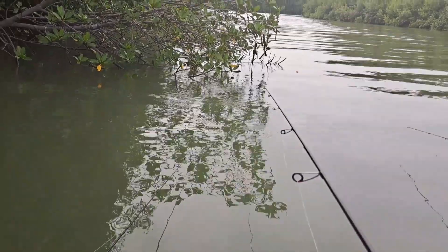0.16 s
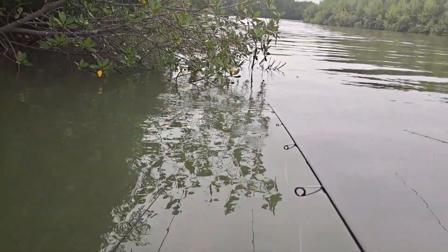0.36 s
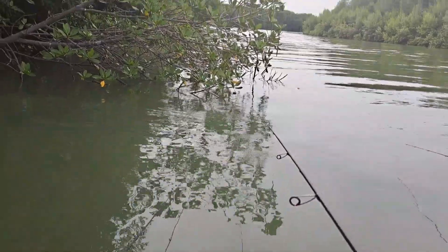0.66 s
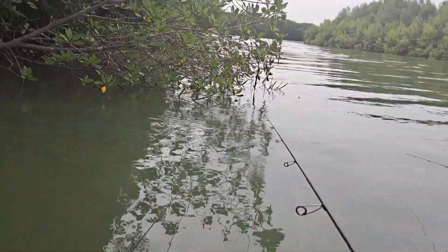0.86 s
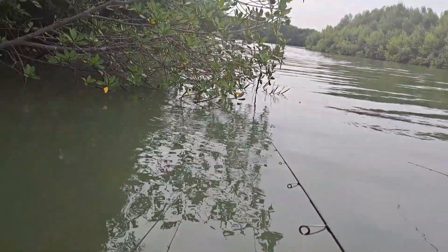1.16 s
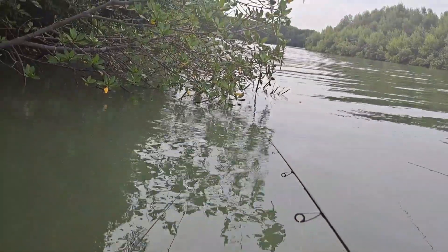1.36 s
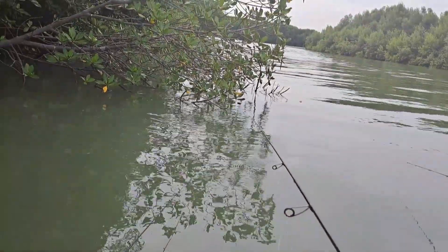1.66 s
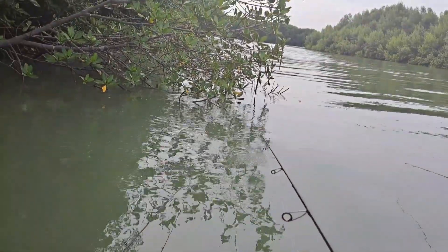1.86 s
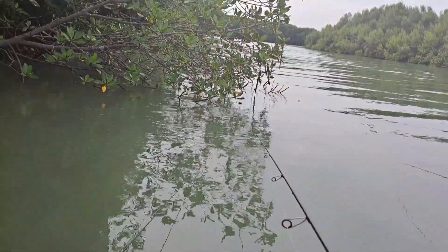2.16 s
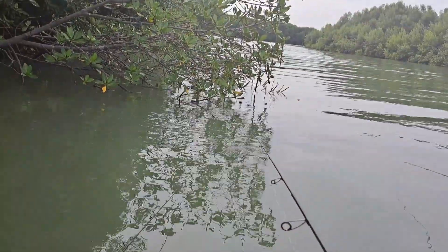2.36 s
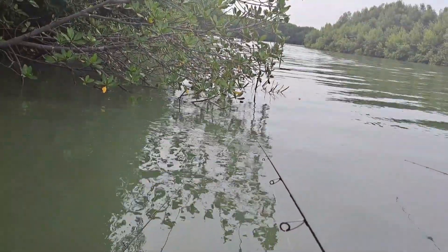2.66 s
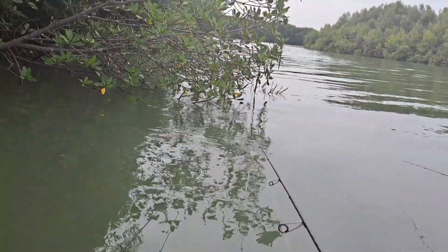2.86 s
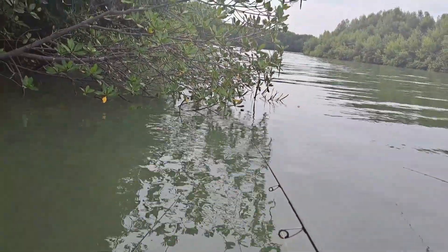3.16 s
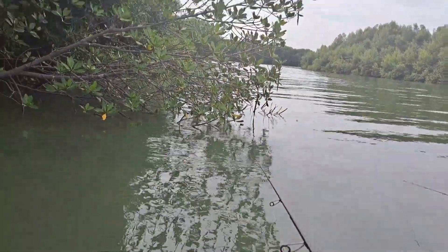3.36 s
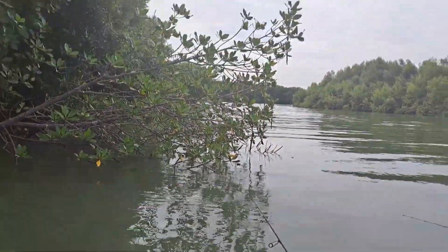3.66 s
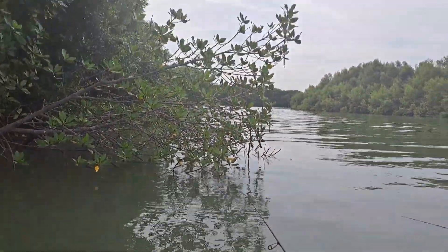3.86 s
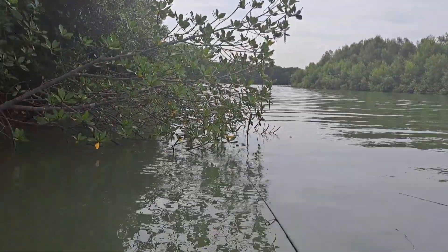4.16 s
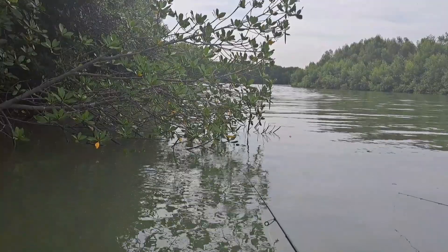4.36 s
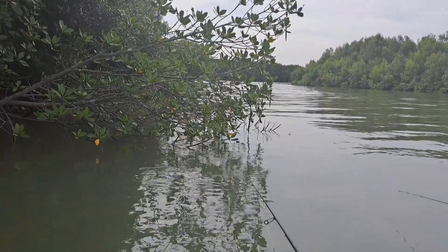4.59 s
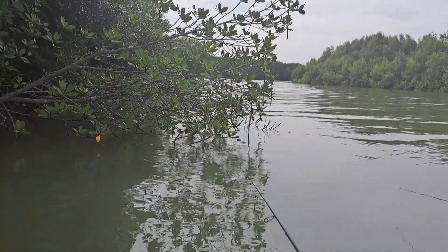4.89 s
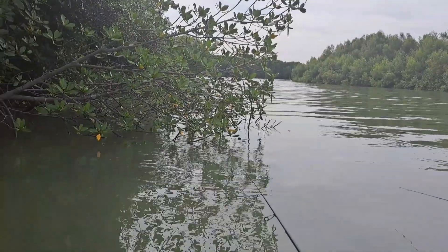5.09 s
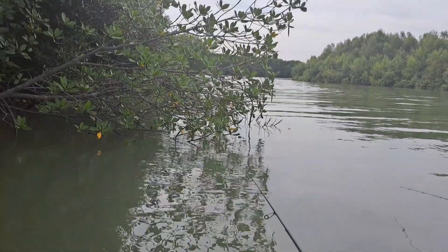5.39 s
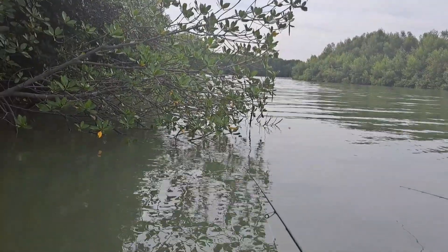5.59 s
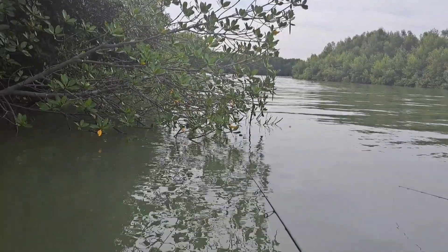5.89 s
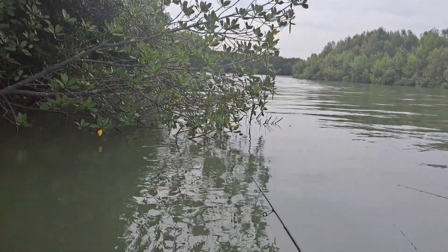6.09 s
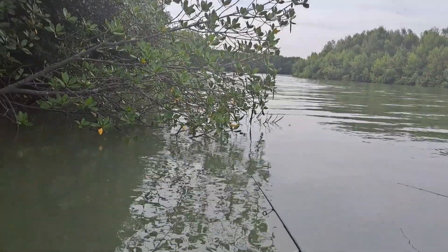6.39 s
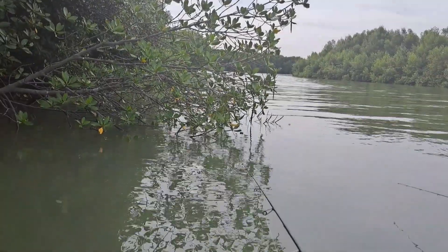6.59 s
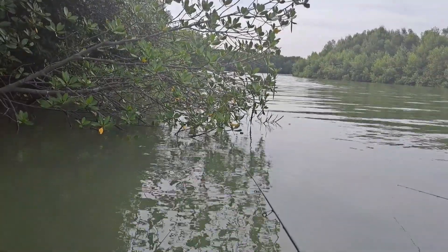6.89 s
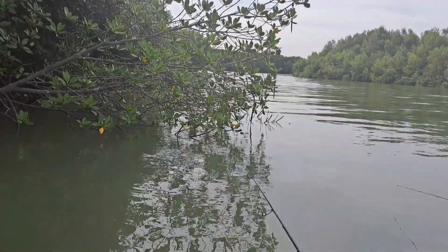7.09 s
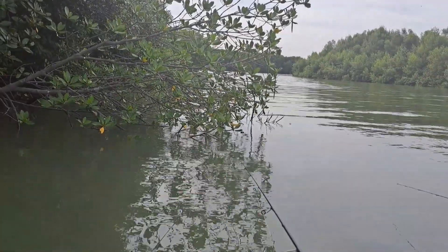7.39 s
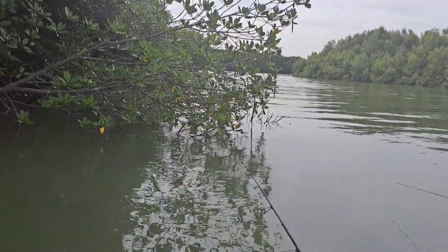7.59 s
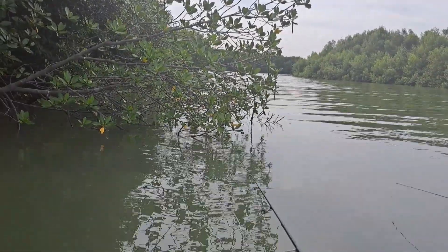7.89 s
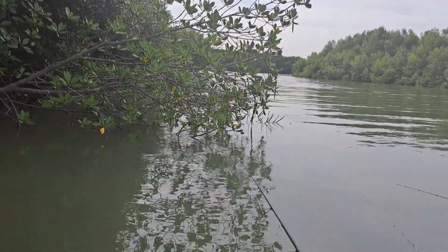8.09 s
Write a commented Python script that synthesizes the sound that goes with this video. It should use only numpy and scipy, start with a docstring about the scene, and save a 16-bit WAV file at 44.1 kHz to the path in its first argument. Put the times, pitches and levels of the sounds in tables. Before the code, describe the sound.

A shrill, steady insect drone fills a mangrove riverbank while birds give short falling buzzy whistles, a sharp click sounds, and soft low thumps follow.

```python
"""Mangrove river from a boat

Insects shrill steadily in the trees: bands of noise with a few wavering sines standing out. Birds give
buzzy falling whistles and thin calls (trilled sines), sharp hoarse chirps and far hoots.
Water laps and drips at the hull (rising sines and noise bursts); a hand on the camera makes a sharp click,
lighter knocks and low thumps. Shaped noise makes wind, a far low rumble, river wash and leaf hiss."""
import sys
import numpy as np
from scipy import signal
from scipy.fft import rfft, irfft
from scipy.io import wavfile

SR = 44100
rng = np.random.default_rng(int(sys.argv[2]) if len(sys.argv) > 2 else 0)


def waveform_to_disk(signal):
    """Save audio, clipped to [-1, 1], as 16-bit WAV at the path in sys.argv[1]."""
    frames = np.transpose(np.atleast_2d(signal))
    scaled = np.clip(frames, -1, 1) * 32767
    samples = np.round(scaled).astype(np.int16)
    wavfile.write(sys.argv[1], SR, samples)


N = 363825
TIME = np.arange(N) / SR
HZ = np.fft.rfftfreq(N, 1 / SR)

# In every table a left-right balance in dB is positive towards the left.
# Colour of the insect chorus. Each row: frequency in Hz, relative level in dB per Hz.
CHORUS_COLOUR = [(6700, -63), (7100, -33.5), (7450, -30), (7750, -18), (8050, -6.5), (8300, 1.5),
                 (8450, -0.5), (8650, 0), (8800, -8.5), (8950, -20), (9250, -27), (9600, -34), (10300, -48)]
# Single insects that stand out. Each row: pitch in Hz, typical waver in Hz,
# base level in dB against the chorus, left-right balance in dB.
SOLO_INSECTS = [(8100, 22, -22, -7.5), (8260, 29.47, -12, -0.5), (8320, 40, -6.5, 6),
                (8390, 25.04, -15, 12), (8676, 45, -15, 4.5), (9050, 7.8, -26.5, 9.5),
                (9040, 31, -27.5, 8.5)]
# The chorus sings in surges with brief lulls. Each row: time in seconds, level change in dB.
CHORUS_SURGE = [(0, 0.9), (0.22, 2.9), (0.5, 2), (0.62, 1.3), (0.85, 0.7), (1.25, 2.5), (1.42, 0.4),
                (1.57, -1.0), (1.68, 2.2), (2.0, 3), (2.2, 3), (2.6, 0.8), (2.8, 1), (3.05, 0.8), (3.52, 0),
                (3.62, -2), (4.08, 1.5), (4.3, 0), (4.68, 0.0), (4.82, 1.5), (5.22, -1.2), (5.58, 2.1),
                (5.82, 0), (5.94, 3.5), (6.25, 2), (6.52, 2.5), (6.72, 0.5), (6.9, 3), (7.15, 1.7),
                (7.5, 4), (7.78, -0.7), (7.98, 2.0), (8.25, 3.9)]
CHORUS_DB, CHORUS_PAN_DB = -52, 0.5  # level before the surges, and resting left-right balance

# Falling whistles, one curve for each. Each row of a curve: time in seconds, pitch in Hz, level in dB.
WHISTLE_CURVES = [
    [(.375, 3190, -83), (.44, 3173, -69), (.56, 3190, -67.5), (.68, 3130, -74), (.71, 3096, -65),
     (.85, 2993, -69.5), (.885, 2880, -79), (.912, 2835, -66.5), (.945, 2820, -70), (.965, 2750, -83)],
    [(1.97, 3090, -82), (2.02, 3205, -71), (2.11, 3370, -78), (2.18, 3294, -69.5), (2.25, 3170, -64),
     (2.31, 3128, -64.5), (2.465, 2930, -72), (2.5, 2918, -64), (2.535, 2883, -65), (2.56, 2830, -81)],
    [(2.71, 3500, -91), (2.79, 3304, -67), (2.86, 3190, -65.5), (2.95, 2930, -72), (3.02, 2830, -71),
     (3.095, 2780, -83)],
    [(5.315, 3100, -82), (5.355, 3160, -71), (5.39, 3260, -71), (5.425, 3510, -76), (5.48, 3530, -73.5),
     (5.545, 3380, -68), (5.6, 3190, -68.5), (5.66, 3066, -66.5), (5.77, 2994, -69.5), (5.79, 2950, -76),
     (5.83, 2890, -66), (5.888, 2895, -64.5), (5.91, 2830, -87)],
]
# Length in seconds of the clear note that closes each whistle, in the same order.
WHISTLE_CLOSINGS = [.06, 0.086, 0.029, 0.084]
# Thin high calls. Each row: start in seconds, length in seconds, first pitch in Hz, last pitch in Hz,
# level in dB, length of the held note in seconds, level of the held note in dB.
THIN_CALL_ROWS = [(0, 0.22, 4485, 4476, -68, .09, -62.5), (0.398, .268, 4370, 4358, -77, 0.076, -71.5),
                  (1.67, 0.2, 4160, 3980, -79, 0.04, -76), (1.766, .28, 3830, 3740, -85, 0.11, -84),
                  (1.88, 0.14, 3995, 3985, -81, .043, -88), (2.073, 0.15, 3660, 3780, -77, 0.079, -76),
                  (5.022, 0.095, 4340, 4010, -81.5, 0.022, -70.5),
                  (5.142, 0.14, 3960, 3895, -72, 0.039, -87)]
# A faint, very high squeak. Each row: time in seconds, pitch in Hz, level in dB.
SQUEAK_CURVE = [(2.19, 10800, -82), (2.24, 11600, -68), (2.27, 10900, -79), (2.33, 11300, -69),
                (2.38, 10600, -79)]
# Chirps. Each row: start in seconds, length in seconds, top pitch in Hz, level in dB,
# rasp as a share of the pitch, hoarse upper voice in dB, left-right balance in dB.
CHIRP_ROWS = [(0.18, 0.092, 4290, -66.5, 0.046, -7, -7.5), (1.214, 0.0624, 3907, -62, 0.014, -28, -19),
              (1.216, .12, 5150, -75, 0.023, -18, -5), (1.45, 0.064, 3220, -82, .006, -30, -20.5),
              (3.433, 0.028, 4900, -73.5, 0.048, -34, -25), (4.789, .04, 3400, -87, .004, -28, -8)]
# Far hollow bird calls. Each row: start in seconds, length in seconds, pitch in Hz,
# level in dB before a 3 dB cut.
HOOT_ROWS = [(3.693, 0.17, 705, -65), (7.542, 0.12, 595, -69), (7.628, 0.22, 690, -68)]
# Echo of the bank. Each row: frequency in Hz, seconds to die by 60 dB at full linger.
BANK_ECHO = [(200, 0.15), (1500, 0.33), (4000, 0.58), (12000, 0.033)]
SLUR_S, RELEASE_S = 0.024, 0.012  # a trill melts into its held note; a trilled call fades in and out
FALL_BOW = 2  # over 1, the pitch of a thin call moves early and then flattens

# A sharp click with its bounces, then lighter knocks on the camera.
# Each row: start in seconds, peak of the push in dB before panning, corner in Hz above which it dulls.
KNOCK_ROWS = [(3.4116, -32.5, 1260), (3.415, -22, 1420), (3.4184, -33.5, 3500), (3.4188, -47, 1200),
              (3.4249, -41, 1210), (3.4269, -41, 3000), (3.437, -43, 1110), (3.4799, -34, 1110),
              (3.488, -50, 900), (3.499, -42, 1020), (3.669, -43, 1030), (3.786, -45.5, 950),
              (4.479, -41, 1130), (4.62, -50, 1910), (5.153, -46.5, 920), (5.787, -51.5, 940),
              (6.43, -56, 800), (7.039, -53, 695)]
# Colour of the camera body. Each row: frequency in Hz, level in dB.
CASE_COLOUR = [(60, -14), (200, -5.5), (330, 12.5), (480, 14.5), (700, 9), (950, 9), (1200, 6.5), (1650, 1),
               (2100, 2.5), (2600, 2.5), (4000, 7), (7000, 6), (15000, -60)]
# Ringing of the camera body. Each row: pitch in Hz, level in dB against the push,
# seconds to die by 60 dB.
CASE_RINGS = [(440, -27, 0.067), (607, -38, 0.037), (1170, -34, 0.066), (1640, -22, 0.029),
              (1860, -24, .03), (2035, -33.5, .03), (2370, -36, 0.028)]
KNOCK_PAN_DB = -22  # the hand is by the right port
PORT_LAG_S = .0005  # sound from the right reaches the left port this much later
# Soft thumps. Each row: start in seconds, level in dB, settled pitch in Hz, swell time in seconds,
# left-right balance in dB.
THUMP_ROWS = [(4.068, -28.5, 46.3, 0.026, -24), (4.305, -35.5, 52.5, 0.029, -22),
              (4.506, -38.5, 46, 0.022, -19), (4.85, -43, 59.5, 0.022, -13), (5.455, -39, 49.1, 0.05, -23),
              (5.59, -48, 70, 0.032, -28)]

# Laps at the hull, a low plop with brighter splashes. Each row: start in seconds, level in dB before
# the plop and slap trims, pitch of plop and slap in Hz, splash centre in Hz,
# splash in dB against the row's level, left-right balance in dB.
LAP_ROWS = [(.666, -35.5, 356, 1160, -24.5, 5), (.823, -37.5, 357, 1040, -19.5, -7.5),
            (1.367, -49, 484, 1150, -9, -13), (4.478, -45.5, 405, 1930, -27, -7),
            (4.618, -46, 410, 1960, -22.5, -5)]
# Drips and small plops. Each row: start in seconds, level in dB, centre in Hz, width in octaves,
# seconds to die by 60 dB, left-right balance in dB.
DRIP_ROWS = [(.957, -63, 1910, 0.13, .07, 0), (1.068, -60.5, 1220, 0.09, 0.09, -11),
             (2.864, -67, 2230, 0.15, 0.31, -7), (5.189, -69.5, 1980, 0.21, 0.24, 4),
             (7.978, -51, 1870, 0.37, 0.12, -10), (7.989, -64, 2030, 0.27, 0.1, -10),
             (7.98, -62.5, 5000, 2.5, .2, 8)]
# Dry ticks of the tackle. Each row: start in seconds, level in dB, centre in Hz, width in octaves.
TICK_ROWS = [(.692, -40.5, 2700, 1.4), (1.368, -52, 1810, 1.5), (1.374, -47.5, 2300, 1.1),
             (1.518, -56, 5800, 0.49), (2.365, -59, 5000, 1.1), (3.228, -41, 11400, 0.39),
             (3.229, -55, 2560, 0.42)]

# A faint low hum. In order: start in seconds (before zero, so it begins at zero), length in seconds,
# pitch in Hz, level in dB.
LOW_HUM = (-0.15, 1.88, 218.5, -62)
# Colour of the open air. Each row: frequency in Hz, relative level in dB per Hz.
AIR_COLOUR = [(15, -43), (25, -22.5), (40, -16.5), (54, -1), (92, -6.5), (145, -2), (230, -8.5), (300, -14),
              (450, -20), (700, -26), (850, -35), (1150, -43), (1600, -49), (2400, -47.5)]
# Colour of the leaf hiss. Each row: frequency in Hz, relative level in dB per Hz.
HISS_COLOUR = [(1500, 2.5), (2500, -1), (4000, -2.5), (6500, -7), (10000, -5.5), (11500, 2), (13000, -2),
               (15500, -6)]
# How alike left and right are in the air. Each row: frequency in Hz, likeness from 0 to 1.
AIR_LIKENESS = [(50, 0.98), (130, 0.9), (290, 0.83), (640, 0.071), (1400, 0), (15000, 0)]
# Side the air leans to. Each row: frequency in Hz, left-right balance in dB.
AIR_SIDES = [(60, -1), (130, -1.5), (290, -0.5), (640, 2.5), (1410, -8), (3100, -22), (6820, 13),
             (15000, 0.5)]
# Strength of the breeze, full in the low wind and partial in the rumble.
# Each row: time in seconds, level change in dB.
BREEZE_CURVE = [(0, -1.5), (.8, 1), (1.6, -2), (2.6, -1.5), (3.1, -1), (3.7, 0.5), (5.8, 1.5), (6.2, 6),
                (6.8, 3.5), (7.4, 8.5), (8.25, 2.5)]
# Ripples wash in among the roots. Each row: middle in seconds, length in seconds, rise in dB.
RIPPLE_ROWS = [(.4, 2.24, 7), (1.3, 0.8, 12), (1.8, 0.86, 6.5), (2.25, 0.56, 7), (3.05, 0.72, 6),
               (4.1, 2.5, 5.5), (5, 0.6, 7), (5.85, 0.27, 5), (7.5, 4, 4)]
# Leaf hiss, which settles. Each row: time in seconds, level in dB before a 10 dB lift.
LEAF_CURVE = [(0, -76.5), (.2, -84), (1.35, -82.5), (1.6, -87.5), (3.1, -85.5), (3.8, -87), (6.4, -87.5),
              (8.25, -87.5)]
EDGE_HZ = 15600  # upper limit of the camera's sound


def insects(throb_hz=16.3, throb_s=0.008, throb_drift=0.01, near_db=-9.5, flutter_db=0.36,
            sway_db=0.3, solo_surge=0.6, solo_swell_db=1.8, drift_hz=7):
    """Countless tymbals blur into a shrill band; a near insect pulses and soloists waver and swell."""
    surge, = follow(CHORUS_SURGE, TIME)
    colour = gain_of(read(CHORUS_COLOUR, HZ))
    crowd = evened(irfft(rfft(rng.standard_normal((2, N))) * colour, N))
    # seconds since the near insect's last pulse; each pulse starts sharply and dies
    turns = np.cumsum(throb_hz * (1 + throb_drift * wander(N, 2.5))) / SR
    since = turns % 1 / throb_hz
    bursts = rng.standard_normal(N) * np.exp(-since / throb_s)
    near = evened(irfft(rfft(bursts) * colour, N))
    out = crowd + gain_of(near_db) * from_right(place(near, 0))
    for hz, waver, db, side in SOLO_INSECTS:
        pitch = hz + drift_hz * wander(N, 1.497)
        # each ear gets its own quick waver
        voice = evened(np.array([tone(pitch + waver * wander(N, 72.0)) for port in range(2)]))
        extra_surge = solo_surge * (surge - surge.mean())
        level = gain_of(db + extra_surge + solo_swell_db * wander(N, 3.6))
        out += level * place(voice, side)
    out = place(out / np.std(out.mean(0)), CHORUS_PAN_DB + sway_db * wander(N, 5.6))
    return out * gain_of(CHORUS_DB + surge + flutter_db * wander(N, 4.3))


def birds(chirp_db=0, song_echo_db=-14, song_linger=0.41, chirp_echo_db=-8.0):
    """Whistlers on the bank; chirps and hoots, from deeper among the branches, have a stronger echo."""
    songs, calls = whistles() + thin_calls(), np.zeros((2, N))
    start, end = SQUEAK_CURVE[0][0], SQUEAK_CURVE[-1][0]
    hz, db = follow(SQUEAK_CURVE, np.arange(start, end, 1 / SR))
    squeak = gain_of(db) * trill(hz, rate_hz=117, depth_hz=163, gap=0.32, rasp=1.2)
    add(songs, start, place(squeak, 5.1))
    for row in CHIRP_ROWS:
        s, sound = chirp(*row)
        add(calls, s, gain_of(chirp_db) * sound)
    for s, length, hz, db in HOOT_ROWS:
        add(calls, s, place(note(length, hz, db - 3.0, waver=0.057, waver_hz=110), 11))
    song_echo = gain_of(song_echo_db) * bank(songs, song_linger)
    call_echo = gain_of(chirp_echo_db) * bank(calls)
    return from_right(songs + calls + song_echo + call_echo)


def whistles(fast_hz=108, slow_hz=50, low_hz=2850, high_hz=3480, end_depth_hz=42, top_depth_hz=85,
             gap=0.88, held_quaver=0.2, rasp=0.43, strain_rasp=0.34, pan_db=-12.5):
    """A trill slows and narrows as its pitch falls, then melts into a clear note; high pitch is hoarser."""
    out = np.zeros((2, N))
    for curve, held in zip(WHISTLE_CURVES, WHISTLE_CLOSINGS):
        start, end = curve[0][0], curve[-1][0]
        t = np.arange(start, end, 1 / SR)
        hz, db = follow(curve, t)
        height = np.clip((hz - low_hz) / (high_hz - low_hz), 0, 1)
        quaver = 1 - settled(t, end - held) * (1 - held_quaver)
        rate = slow_hz + (fast_hz - slow_hz) * height
        depth = end_depth_hz + (top_depth_hz - end_depth_hz) * height
        hoarseness = rasp + strain_rasp * height ** 4
        voice = trill(hz, rate, quaver * depth, quaver * gap, rasp=hoarseness)
        add(out, start, place(voice * gain_of(db), pan_db))
    return out


def thin_calls(rate_hz=45, depth_hz=30, start_db=-1, held_quaver=0.11, pan_db=-6):
    """A higher, thinner voice quavers and glides into its clear note."""
    out = np.zeros((2, N))
    for s, length, first_hz, last_hz, db, held, held_db in THIN_CALL_ROWS:
        t = np.arange(0, length, 1 / SR)
        ahead = 1 - t / length  # share of the call still to come
        clear = settled(t, length - held)
        quaver = 1 - clear * (1 - held_quaver)
        pitch = last_hz + (first_hz - last_hz) * ahead ** FALL_BOW
        voice = trill(pitch, rate_hz, quaver * depth_hz, gap=0.93 * quaver,
                      uneven=0.483, rasp=0.69, waver_db=-0.5)
        level = db + start_db * ahead ** 4 + clear * (held_db - db)
        add(out, s, place(voice * gain_of(level), pan_db))
    return out


def trill(hz, rate_hz, depth_hz, gap, uneven=0.15, rasp=0.41, waver_db=1.5):
    """A run of quick upward flicks around a pitch curve; the voice dips between them."""
    size = len(hz)
    turns = np.cumsum(rate_hz * (1 + uneven * wander(size, 45))) / SR
    pause, flick = np.cos(np.pi * turns) ** 4, -np.sin(2 * np.pi * turns)
    pitch = hz + depth_hz * (flick + rasp * wander(size, 330))
    voice = tone(pitch) * (1 - np.clip(gap, 0, 1) * pause)
    left_s = np.arange(size)[::-1] / SR
    nearest_end_s = np.minimum(left_s, left_s[::-1])
    edges = np.sin(np.pi / 2 * np.minimum(nearest_end_s / RELEASE_S, 1))
    return evened(voice) * gain_of(waver_db * wander(size, 24)) * edges


def settled(t, start):
    """Goes smoothly from 0 to 1 as a trill melts into its closing note."""
    return .5 + .5 * np.tanh(2 * (t - start) / SLUR_S)


def chirp(s, length, top_hz, db, rasp, upper_db, pan_db, arch=0.069, upper_ratio=1.17, upper_octaves=0.21):
    """A short note whose pitch arches, with a hoarse band of noise above it."""
    u = np.linspace(-1, 1, int(length * SR))
    hz = top_hz * (1 - arch * (u - .1) ** 2 + rasp * wander(len(u), 640))
    hoarse = gain_of(upper_db) * band(len(u), top_hz * upper_ratio, upper_octaves)
    voice = evened((tone(hz) + hoarse) * signal.windows.tukey(len(u), .6))
    return s, place(gain_of(db) * voice, pan_db)


def note(length, hz, db, waver, waver_hz, sag=0):
    """A soft-edged clear note whose pitch wavers by a small share; a positive sag makes it sink."""
    u = np.linspace(-.5, .5, int(length * SR))
    pitch = hz * (1 - sag * u + waver * wander(len(u), waver_hz))
    return gain_of(db) * evened(tone(pitch) * signal.windows.tukey(len(u), .55))


def bank(x, linger=1):
    """Scattered echoes from trunks and leaves die at a speed set by pitch; linger scales their time."""
    taps = rng.standard_normal((2, SR)) * (rng.random((2, SR)) < .05)
    hz, t, z = signal.stft(taps, SR, nperseg=256)
    fade = gain_of(-60 * t / (linger * read(BANK_ECHO, hz)[:, None]))
    build_up = np.minimum(t / 0.013, 1)
    tail = signal.istft(z * fade * build_up, SR, nperseg=256)[1]
    return signal.fftconvolve(x.mean(0)[None], tail / np.linalg.norm(tail[0]), axes=1)[:, :N]


def knocks(rattle_db=-31, rattle_t60=0.73, rattle_per_s=520, slope=4.5, crack_db=-39):
    """A dull push rings the camera body briefly, then a faint rattle of tiny contacts follows."""
    out, size = np.zeros((2, N)), 4096
    t, hz = np.arange(size) / SR, abs(np.fft.fftfreq(size, 1 / SR))
    ring = sum(gain_of(db - 60 * t / t60) * np.sin(2 * np.pi * f * t) for f, db, t60 in CASE_RINGS)
    for s, db, corner_hz in KNOCK_ROWS:
        # treble falls away above the corner, down to a small crisp remainder
        contact = (1 + (hz / corner_hz) ** (2 * slope)) ** -.5 + gain_of(crack_db)
        log_gain = np.log(gain_of(read(CASE_COLOUR, hz)) * contact)
        # a pulse of that colour with its energy packed at the start
        push = np.fft.ifft(np.exp(np.conj(signal.hilbert(log_gain)))).real
        push /= abs(push).max()
        hits = rng.standard_normal((2, size)) * (rng.random(size) < rattle_per_s / SR)
        hits = hits * gain_of(rattle_db - 60 * t / rattle_t60)
        rattle = signal.fftconvolve(hits, push[None], axes=1)[:, :size]
        add(out, s, gain_of(db) * place(push + ring + rattle, KNOCK_PAN_DB))
    return out


def thumps(sag=0.46, scuff_db=-15, scuff_hz=115, shove_db=-15, shove_hz=32):
    """Soft pushes near the right port: low cycles swell, sag in pitch and die, with scuff and shove noise."""
    out, t = np.zeros((2, N)), np.arange(SR // 2) / SR
    for s, db, hz, swell, pan in THUMP_ROWS:
        u = t / swell
        body = -tone(hz * (1 + sag * np.exp(-u)))
        scuff = gain_of(scuff_db) * band(len(t), scuff_hz, 0.54)
        shove = gain_of(shove_db) * band(len(t), shove_hz, 0.32)
        shape = (u * np.exp(1 - u)) ** 2
        add(out, s, place(gain_of(db) * shape * (body + scuff + shove), pan))
    return out


def small_sounds(plop_db=-3, slap_db=-4, slap_octaves=0.62, slap_t60=0.17, splash_octaves=0.79,
                 splash_t60=0.24, tick_t60=0.01, tick_pan_db=-3, echo_db=-14):
    """Water slaps the hull in short splashes and drips; rod and line give dry ticks."""
    out, t = np.zeros((2, N)), np.arange(SR // 4) / SR
    for s, db, slap_hz, splash_hz, splash_db, pan in LAP_ROWS:
        lap = plop(db + plop_db, slap_hz)
        lap = lap + splash(db + slap_db, slap_hz, slap_octaves, slap_t60)
        lap = lap + splash(db + splash_db, splash_hz, splash_octaves, splash_t60)
        add(out, s, place(lap, pan))
    for s, db, hz, octaves, t60, pan in DRIP_ROWS:
        add(out, s, place(splash(db, hz, octaves, t60), pan))
    for s, db, hz, octaves in TICK_ROWS:
        tick = gain_of(db - 60 * t / tick_t60) * band(len(t), hz, octaves) / 2
        add(out, s, place(tick, tick_pan_db))
    return out + gain_of(echo_db) * bank(out)


def plop(db, hz, t60=0.067, attack_s=0.0035, rise_per_s=4.1):
    """A pocket of air trapped at the hull rings for some cycles and rises in pitch."""
    t = np.arange(SR // 4) / SR
    return tone(hz * (1 + rise_per_s * t)) * gain_of(db - 60 * t / t60) * np.minimum(t / attack_s, 1)


def splash(db, hz, octaves, t60, attack_s=0.0023):
    """A short burst of water noise that dies away."""
    t = np.arange(SR // 4) / SR
    return band(len(t), hz, octaves) * gain_of(db - 60 * t / t60) * np.minimum(t / attack_s, 1) / 2


def hum(pan_db=0):
    """A single low tone with a slightly wavering pitch fades in and out."""
    out = np.zeros((2, N))
    s, length, hz, db = LOW_HUM
    add(out, s, place(note(length, hz, db, waver=0.0067, waver_hz=4.6), pan_db))
    return out


def air(wind_db=-60, rumble_db=-54.0, rumble_share=0.41, wash_db=-77, hiss_db=10,
        wind_hz=85, split_hz=420, gust_db=0.5, lump_db=1.74):
    """Noise split by pitch into low wind, far rumble and river wash, plus a thin hiss of leaves."""
    a, b = rfft(rng.standard_normal((2, N)))
    same = np.clip(read(AIR_LIKENESS, HZ), -1, 1)
    # the right side shares part of the left side's noise
    pair = place(np.array([a, same * a + np.sqrt(1 - same ** 2) * b]), read(AIR_SIDES, HZ))
    deep, low = 1 / (1 + (HZ / wind_hz) ** 6), 1 / (1 + (HZ / split_hz) ** 6)
    body = pair * gain_of(read(AIR_COLOUR, HZ)) / (1 + (HZ / 2600) ** 8)
    hiss = rfft(rng.standard_normal((2, N))) * gain_of(read(HISS_COLOUR, HZ)) * (1 - low)
    (breeze,), (leaves,) = follow(BREEZE_CURVE, TIME), follow(LEAF_CURVE, TIME)
    out = evened(irfft(hiss, N)) * gain_of(leaves + hiss_db)
    wind = (deep, wind_db + breeze + gust_db * wander(N, 2.5))
    rumble = (low - deep, rumble_db + rumble_share * breeze)
    wash = (1 - low, wash_db + swells(RIPPLE_ROWS))
    for share, db in [wind, rumble, wash]:
        out += evened(irfft(body * share, N)) * gain_of(db + lump_db * wander(N, 11.0))
    return out


def swells(rows):
    """Rounded rises and falls, in dB over the whole scene."""
    return sum(db * np.cos(np.pi * np.clip((TIME - middle) / length, -.5, .5)) ** 2
               for middle, length, db in rows)


def gain_of(db):
    """Decibels to gain."""
    return 10 ** (np.asarray(db) / 20)


def evened(x):
    """Scales to an average (rms) strength of 1."""
    return x / np.sqrt(np.mean(x ** 2) + 1e-20)


def read(points, hz):
    """Reads a spectrum on a log-frequency axis."""
    f, value = np.transpose(points)
    return np.interp(np.log(hz + 1), np.log(f + 1), value)


def follow(rows, t):
    """Reads each column of a curve at the times t."""
    s, *columns = np.transpose(rows)
    return [np.interp(t, s, c) for c in columns]


def tone(hz):
    """A sine that follows a pitch curve."""
    return np.sin(2 * np.pi * np.cumsum(hz) / SR)


def wander(size, rate_hz):
    """Smooth random motion of rms 1."""
    hz = np.fft.rfftfreq(size, 1 / SR)
    slow = np.exp(-(hz / rate_hz) ** 2) * (hz > 0)
    return evened(irfft(rfft(rng.standard_normal(size)) * slow, size))


def band(size, centre_hz, octaves):
    """Noise under one rounded hill of the spectrum."""
    away = np.log2((np.fft.rfftfreq(size, 1 / SR) + 1) / centre_hz) / octaves
    return evened(irfft(rfft(rng.standard_normal(size)) / (1 + away ** 2 / 2) ** 2, size))


def place(x, pan_db):
    """Shares a sound between left and right, keeping the mean of the two gains."""
    left = 2 / (1 + gain_of(-pan_db))
    return np.array([left, 2 - left]).reshape(2, -1) * x


def from_right(pair):
    """Delays the left channel by the way between the two ports."""
    lag = round(PORT_LAG_S * SR) / SR
    return np.array([np.interp(TIME - lag, TIME, pair[0]), pair[1]])


def add(mix, s, sound):
    """Adds a stereo sound at time s, or at zero if s is earlier."""
    part = mix[:, max(round(s * SR), 0):][:, :sound.shape[1]]
    part += sound[:, :part.shape[1]]


def scene():
    """All sources together."""
    return insects() + birds() + knocks() + thumps() + small_sounds() + hum() + air()


def record(dry):
    """The camera's band limit: a steep filter removes the highest treble."""
    lowpass = signal.firwin(511, EDGE_HZ, window=("kaiser", 9), fs=SR)
    return signal.oaconvolve(dry, lowpass[None], "same")


dry = scene()
out = record(dry)
waveform_to_disk(out)
```